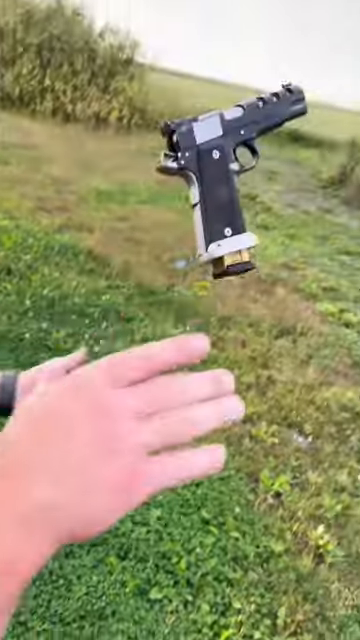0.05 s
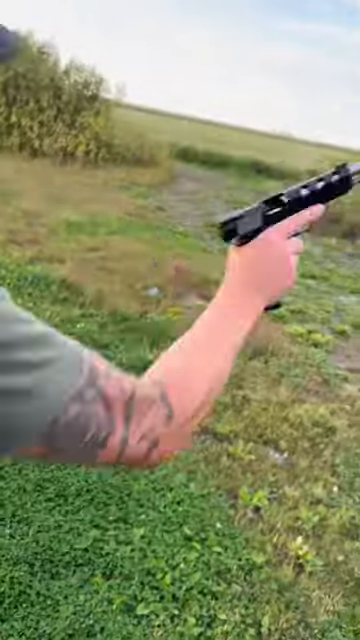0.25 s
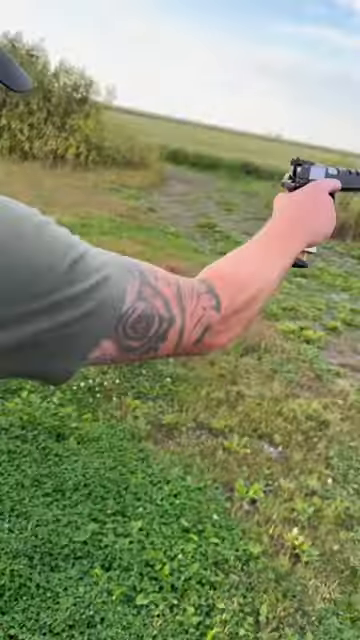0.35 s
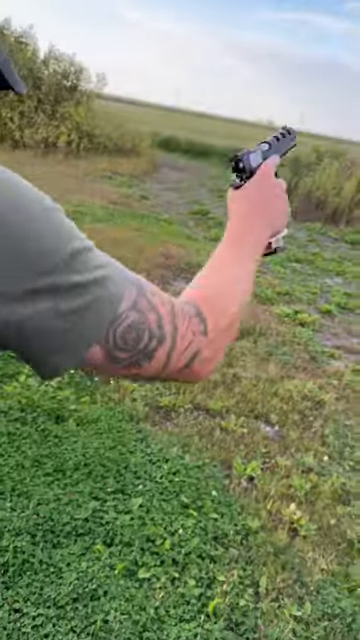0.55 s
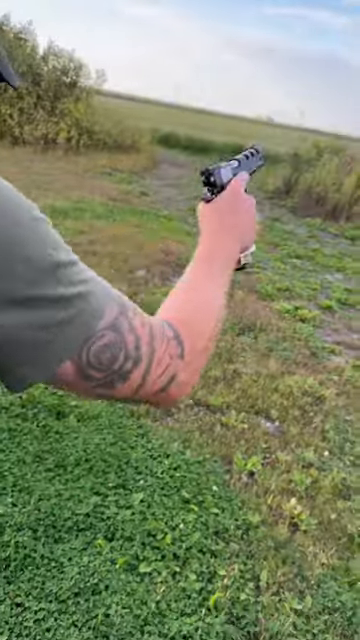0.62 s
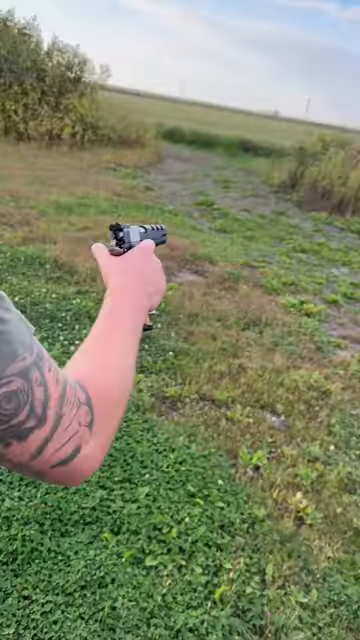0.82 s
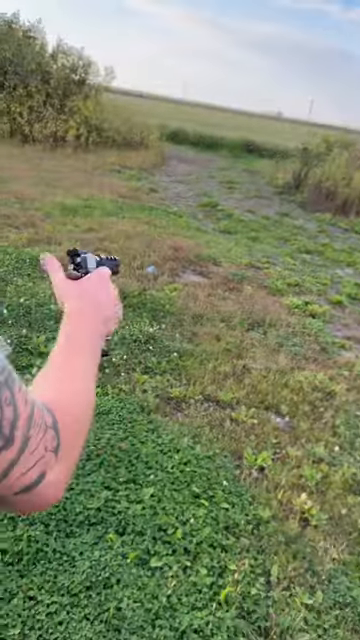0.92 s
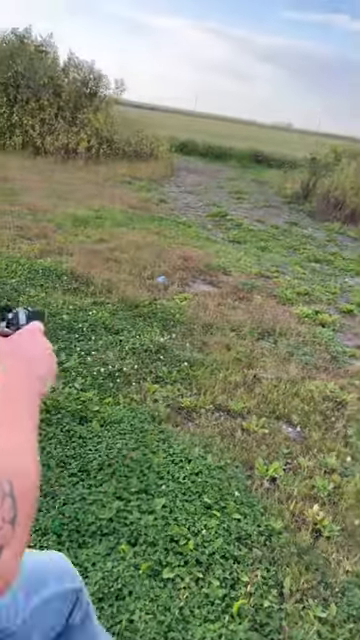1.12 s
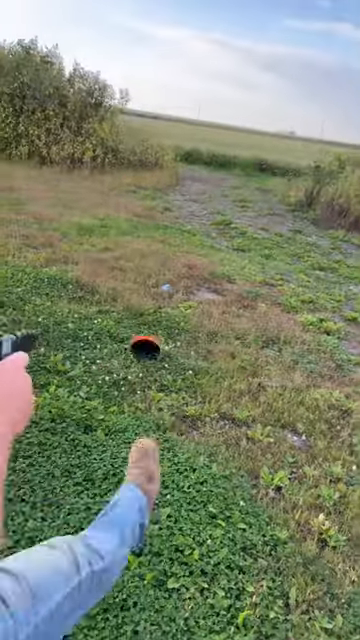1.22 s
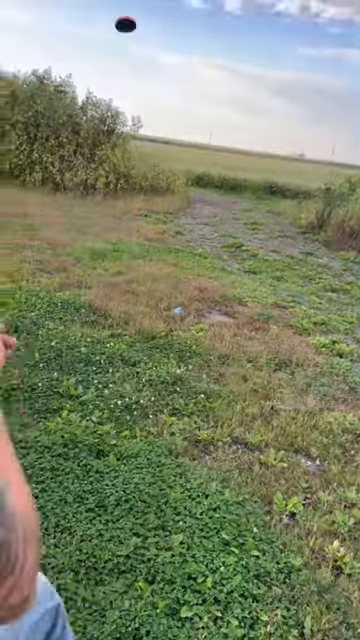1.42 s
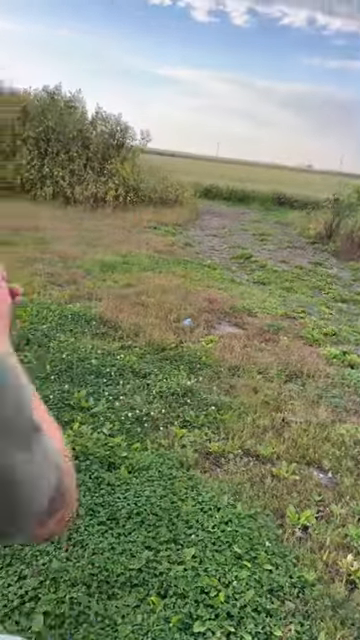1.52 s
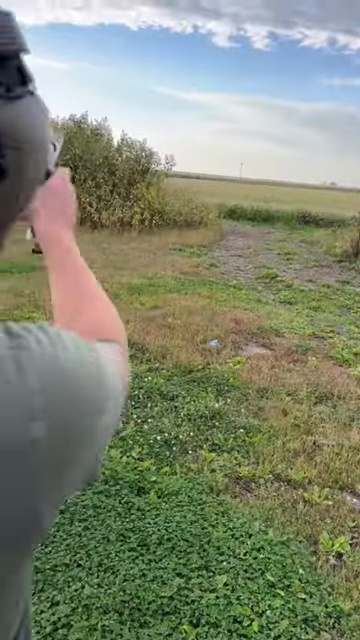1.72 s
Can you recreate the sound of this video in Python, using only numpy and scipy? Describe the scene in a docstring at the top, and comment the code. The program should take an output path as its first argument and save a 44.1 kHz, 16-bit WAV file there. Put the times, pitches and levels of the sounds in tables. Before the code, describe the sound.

A pistol's steel slide slams back at about 0.22 seconds and home at 0.28-0.30, two very loud, bright cracks with a short squeal, rail scrape, metallic ringing and a low thump. Small rattles and dull echoes from bushes fade by 0.5. High insects chirp throughout, dipping briefly after the blows. Soft grass steps come near 1.15 and 1.6, with rustling clothes and faint wind rumble.

```python
"""Insects chirp in an open field throughout, as near whistles, farther swarms and a blur of noise.
A pistol is caught in mid-air: its steel slide slams back and home in two loud, sharp reports, made of
noise bursts, pings and ringing modes, with a squeal and scrape of the rails. Low thumps, sines falling
quickly in pitch, go with the blows and the second step; bushes and far grass scatter noise back.
Small rattles, rustling clothes and two steps in the grass follow, over a light rumble of wind."""
import sys
import numpy as np
from scipy import signal
from scipy.fft import rfft, irfft
from scipy.io import wavfile

SR = 44100
rng = np.random.default_rng(int(sys.argv[2]) if len(sys.argv) > 2 else 0)


def master(y):
    """Save y as 16-bit WAV."""
    cut = np.clip(np.atleast_2d(y).T, -1, 1)
    pcm = np.round(cut * 32767)  # scale
    wavfile.write(sys.argv[1], SR, pcm.astype(np.int16))


N = 77175
T = np.arange(N) / SR  # time in seconds


def from_db(db):
    """Logarithmic level: decibels become an amplitude ratio."""
    return 10 ** (np.asarray(db) / 20)


def level(rows):
    """Amplitude modulation: a gain that follows a curve of seconds and dB."""
    return from_db(np.interp(T, *np.transpose(rows)))


def at_hz(points, hz):
    """Spectral envelope: dB interpolated along a logarithmic frequency axis."""
    point_hz, db = np.transpose(points)
    return np.interp(np.log(hz + 1), np.log(point_hz), db)


def envelope(start, rise, hold, t60):
    """Exponential decay: a straight rise and a hold, then 60 dB of fall in t60 seconds."""
    age = T - start
    release_age = np.maximum(age - rise - hold, 0)
    return np.clip(age / rise, 0, 1) * 1000. ** (-release_age / t60)


def lowpass(x, hz):
    """Zero-phase filtering: a gentle split of steady noise, in phase with its input."""
    return signal.sosfiltfilt(signal.butter(3, hz, fs=SR, output="sos"), x)


# Stereo width of noise. Each row: frequency in Hz, side relative to middle in dB before any added width.
WIDTH = [(60, -44), (250, -21), (650, -8), (1400, -22), (2600, -37.5), (3900, -23.5), (4900, -0.5),
         (5800, -20.5), (7200, -7.5), (9500, 1.5), (11000, 4), (12500, 21), (15000, 8.5)]
AMBIENT_WIDTH_DB = 2  # added width of the surroundings


def noise(spectrum, width_db=0, grains_per_s=0, grain_db=0):
    """Filtered random noise: coloured stereo, crackling grains if asked; the middle has rms 1."""
    hz = np.arange(N // 2 + 1) * SR / N
    white = rng.standard_normal((2, N))
    if grains_per_s:
        grain_times = rng.random(N) < grains_per_s / SR
        unit_power = np.sqrt(SR / grains_per_s)
        grains = rng.standard_normal((2, N)) * grain_times * unit_power
        white = white + from_db(grain_db) * grains  # grain level relative to the steady noise
    mid, side = irfft(rfft(white) * from_db(at_hz(spectrum, hz)), N)
    side = irfft(rfft(side) * from_db(at_hz(WIDTH, hz) + width_db), N)
    return np.array([mid + side, mid - side]) / mid.std()


# Steel hits steel. Each row: start in seconds, level in dB, bass and treble in dB relative to the
# middle band, t60 in seconds, ping pitch in Hz, ping level in dB over the blow's level.
BLOWS = [(0.2167, -13, -5, -3, 0.009, 6600, 1.5), (0.224, -16.5, -1, 2, 0.013, 5300, 1.5),
         (0.2289, -21, -15, -4, 0.01, 2300, -2.5), (0.2292, -14.5, 8, 6, 0.013, 6900, 2.5),
         (0.2438, -26, 1, -11, .05, 2600, 2), (0.2562, -24, -9, -20, 0.021, 1550, 1.5),
         (0.269, -25, 5.5, -16, .03, 1430, 3), (0.2749, -22, -1, -2.5, .02, 4100, 5),
         (0.2813, -14.5, -1, -4, 0.016, 4500, 3.5), (0.288, -27.5, -13, 5, 0.018, 3900, 7),
         (0.2979, -19, -3.5, 9, .012, 7900, 2.5), (0.3018, -16, -2.5, -2, 0.018, 5900, 2),
         (.3080, -27.5, 0.5, 0.5, 0.038, 6500, 0.5), (0.3735, -45.5, 8, -1.5, 0.032, 4400, 1),
         (0.388, -42, 2.5, -10, 0.029, 2150, 10.5), (0.8718, -54, -16.5, 0.5, 0.0098, 3300, -2),
         (1.2853, -59, -1.5, -28, .014, 2600, 2), (1.415, -73.5, 6.5, -11, 0.047, 1650, 4.5)]
# Colour of the blows. Each row: frequency in Hz, relative spectral level in dB.
STEEL_COLOUR = [(150, -39), (380, -23.5), (600, -4.5), (950, -16), (1400, -6.5), (2200, -1), (3200, 0.5),
                (4000, -2.5), (5000, 0), (6600, 0.5), (8500, -5.5), (10500, -8.5), (12200, -30),
                (15000, -14), (17000, -26.5)]
# Colour of their dying tail. Each row: frequency in Hz, relative spectral level in dB.
TAIL_COLOUR = [(200, -22), (700, -10.5), (1200, -17), (2150, 3.5), (2700, -8), (3400, -6.5), (5000, -3),
               (7000, -1.5), (10500, -6), (12000, -33), (16000, -26.5)]
BLOW_RISE_S, PING_T60_S = 0.00045, 0.0097
BASS_EDGE_HZ, TREBLE_EDGE_HZ = 1500, 5000
# tail levels are relative to each blow
NEAR_DB, NEAR_T60_S, FIELD_DB, FIELD_T60_S = -20.5, .1, -46.5, 0.29


def clacks():
    """Impact: each blow is a noise crack and brief ping, then a short scatter and faint field tail."""
    steel = noise(STEEL_COLOUR, grains_per_s=5000, grain_db=-3.5)
    bass = lowpass(steel, BASS_EDGE_HZ)
    treble = steel - lowpass(steel, TREBLE_EDGE_HZ)
    middle = steel - bass - treble
    blows, tail_power = 0, 0
    for s, db, bass_db, treble_db, t60, ping_hz, ping_db in BLOWS:
        colour = from_db(bass_db) * bass + middle + from_db(treble_db) * treble
        crack = envelope(s, BLOW_RISE_S, 0, t60) * colour
        ping_envelope = from_db(ping_db) * envelope(s, BLOW_RISE_S, 0, PING_T60_S)
        ping = ping_envelope * np.sin(2 * np.pi * ping_hz * (T - s))
        blows = blows + from_db(db) * (crack + ping)
        near = from_db(NEAR_DB) * envelope(s, 0.0004, 0, NEAR_T60_S)
        field = from_db(FIELD_DB) * envelope(s, 0.025, 0, FIELD_T60_S)
        tail_power = tail_power + (from_db(db) * (near + field)) ** 2
    return blows + np.sqrt(tail_power) * noise(TAIL_COLOUR)


# Ringing modes of slide and frame. Each row: frequency in Hz, mean level in dB relative to the blow,
# t60 in seconds.
GUN_MODES = [(1936, -29, .1), (2115, -24.5, .11), (2270, -23.5, .1), (2474, -26, .09), (2700, -26, 0.071),
             (3155, -22, .085), (3090, -21, 0.075), (3294, -22.5, .08), (4040, -27, .06), (4224, -25, .06),
             (4490, -25, .06), (4750, -27, 0.089), (4690, -27, .08), (5560, -25, .06), (5800, -23.5, .06),
             (6150, -24, .06), (6630, -21, .06), (7240, -24, 0.049), (8450, -29.5, 0.068),
             (10300, -31.5, 0.049)]


def gun_ring():
    """Modal resonance: every blow excites each damped mode with a random strength and sign."""
    s, db = np.transpose(BLOWS)[:2]
    strength_db = rng.normal(0, 2.5, (len(s), len(GUN_MODES)))
    ring = 0
    for k, (hz, mode_db, t60) in enumerate(GUN_MODES):
        clicks = np.zeros(N)
        signs = rng.choice([-1, 1], len(s))
        clicks[(s * SR).astype(int)] = from_db(db + mode_db + strength_db[:, k]) * signs
        r = np.exp(-np.log(1000) / (t60 * SR))  # decay per sample
        w = 2 * np.pi * hz / SR  # radians per sample
        # two-pole resonator; the tiny offset keeps its state from vanishing
        ring = ring + signal.lfilter([0, np.sin(w)], [1, -2 * r * np.cos(w), r * r], clicks + 1e-18)
    return ring


# Scrape of the slide. Each row: time in seconds, level in dB.
SCRAPE_LEVEL = [(.19, -120), (.215, -46.5), (.222, -33.5), (.248, -32), (.263, -33.5), (.278, -34.5),
                (.295, -45), (.315, -42), (.335, -67), (.38, -120)]
# Colour of the scrape on the rails. Each row: frequency in Hz, relative spectral level in dB.
RAIL_COLOUR = [(300, -28), (700, -10), (1100, -15.5), (2000, -5.5), (2700, -4.5), (3200, 5.5), (3800, -1),
               (5000, -7.5), (7000, -5.5), (10500, -16.5), (12000, -29), (16000, -27.5)]
SQUEAL_S, SQUEAL_HOLD_S, SQUEAL_T60_S = .217, 0.0049, 0.004
SQUEAL_HZ, SQUEAL_DB = 5776, -16.5


def slide():
    """Friction: the slide squeals as a tone as it starts back, and scrapes its rails as grainy noise."""
    squeal_envelope = envelope(SQUEAL_S, BLOW_RISE_S, SQUEAL_HOLD_S, SQUEAL_T60_S)
    squeal = from_db(SQUEAL_DB) * squeal_envelope * np.sin(2 * np.pi * SQUEAL_HZ * T)
    return squeal + level(SCRAPE_LEVEL) * noise(RAIL_COLOUR, grains_per_s=600, grain_db=3)


# Low falling thumps. Each row: start in seconds, level in dB, rise in seconds, t60 in seconds.
THUMPS = [(0.2289, -17.5, 0.018, 0.09), (0.3395, -47, 0.0034, 0.11), (1.604, -50, 0.016, 0.095)]
THUMP_START_HZ, THUMP_END_HZ, THUMP_FALL_S = 664, 47, .0054  # the fall is a time constant
BOOM_S, BOOM_HZ, BOOM_DB, BOOM_T60_S = .315, 46.8, -45.5, 0.58


def low_thumps():
    """Frequency glide: low thumps fall quickly in pitch; a low ring starts separately and lingers."""
    boom_envelope = envelope(BOOM_S, 0.0067, 0, BOOM_T60_S)
    out = from_db(BOOM_DB) * boom_envelope * np.sin(2 * np.pi * BOOM_HZ * (T - BOOM_S))
    for s, db, rise, t60 in THUMPS:
        fall = np.exp(-np.maximum(T - s, 0) / THUMP_FALL_S)
        hz = (THUMP_END_HZ + (THUMP_START_HZ - THUMP_END_HZ) * fall) * (T > s)
        phase = 2 * np.pi * np.cumsum(hz) / SR
        out = out + from_db(db) * envelope(s, rise, 0, t60) * np.sin(phase)
    return out


# Dull echoes from the bushes. Each row: start in seconds, level in dB, rise in seconds, t60 in seconds.
BUSH_ECHOES = [(.31, -36, 0.003, 0.069), (.337, -47, .003, .05), (.42, -67, 0.029, 0.33),
               (0.4207, -56, 0.0014, 0.048), (0.489, -59, 0.0033, 0.051)]
# Colour of the bushes' scatter. Each row: frequency in Hz, relative spectral level in dB.
BUSH_COLOUR = [(500, -33), (1100, -20.5), (1600, -8.5), (2200, 3.5), (2900, -6.5), (3800, -18), (8000, -21),
               (12000, -38)]
# Colour of the far grass's scatter. Each row: frequency in Hz, relative spectral level in dB.
FAR_GRASS_COLOUR = [(1000, -14.5), (3000, -12), (3900, -6), (5000, 1.5), (7000, 0.5), (9500, 1),
                    (10500, -8), (11500, -28)]
HUSH_S, HUSH_DB, HUSH_RISE_S, HUSH_T60_S = 0.365, -61, 0.053, 0.56


def echoes():
    """Diffuse reflection: bushes return dull bursts of noise, the far grass one bright hush."""
    bush_gain = sum(from_db(db) * envelope(s, rise, 0, t60) for s, db, rise, t60 in BUSH_ECHOES)
    dull = bush_gain * noise(BUSH_COLOUR)
    hush_gain = from_db(HUSH_DB) * envelope(HUSH_S, HUSH_RISE_S, 0, HUSH_T60_S)
    return dull + hush_gain * noise(FAR_GRASS_COLOUR)


# Parts of the two steps in the grass. Each row: start in seconds, level in dB, rise in seconds,
# hold in seconds, t60 in seconds.
STEPS = [(1.149, -64.5, 0.0078, 0.043, 0.38), (1.163, -55, .001, 0.0052, 0.051),
         (1.175, -54.5, 0.0038, 0.0062, 0.093), (1.612, -66.5, 0.03, 0.053, 0.87)]
# Colour of crushed turf. Each row: frequency in Hz, relative spectral level in dB.
TURF_COLOUR = [(35, -27), (80, 5), (240, -4), (450, -4.5), (1200, -6.5), (2200, -17), (4000, -23),
               (8500, -15.5), (11000, -21), (12500, -42.5), (16000, -23.5)]
# Colour of the soil's thud. Each row: frequency in Hz, relative spectral level in dB.
SOIL_COLOUR = [(60, -10), (140, -3), (240, 1), (400, -6), (700, -15), (2000, -36)]
THUD_S, THUD_DB, THUD_T60_S = 1.197, -56.5, 0.15  # the sole comes down


def footsteps():
    """Granular crushing: boots press grass into crackling noise, and a sole thuds on the soil."""
    weight = sum(from_db(db) * envelope(s, rise, hold, t60) for s, db, rise, hold, t60 in STEPS)
    crush = weight * noise(TURF_COLOUR, AMBIENT_WIDTH_DB, grains_per_s=900, grain_db=-4)
    thud = from_db(THUD_DB) * envelope(THUD_S, 0.0038, 0, THUD_T60_S) * noise(SOIL_COLOUR)
    return crush + thud


# Rustle of clothes. Each row: time in seconds, level in dB.
RUSTLE_LEVEL = [(0, -89), (.55, -82.5), (.85, -83), (1, -70), (1.12, -69.5), (1.25, -77), (1.36, -80.5),
                (1.57, -76.5), (1.66, -62), (1.75, -72)]
# Colour of the cloth. Each row: frequency in Hz, relative spectral level in dB.
CLOTH_COLOUR = [(100, 7), (400, 0.5), (900, -2), (1700, -2), (3500, -2), (6000, 0), (8000, 4),
                (10500, -2.5), (12000, -24.5), (15500, -12.5)]


def clothes():
    """Friction of fibres: grainy noise that swells and fades."""
    return level(RUSTLE_LEVEL) * noise(CLOTH_COLOUR, AMBIENT_WIDTH_DB, grains_per_s=1200, grain_db=-5.5)


CHIRP_WIDTH_S, CHIRP_SAG_HZ_PER_S = 0.0087, 19000  # width: from the peak to 1/e of it


def chirp(s, hz, db, pan_db):
    """Linear chirp: a falling whistle under a Gaussian swell, panned by level difference."""
    out = np.zeros((2, N))
    near = slice(*np.searchsorted(T, [s - 4 * CHIRP_WIDTH_S, s + 4 * CHIRP_WIDTH_S]))
    age = T[near] - s
    phase = 2 * np.pi * (hz - CHIRP_SAG_HZ_PER_S * age / 2) * age
    tone = np.exp(-(age / CHIRP_WIDTH_S) ** 2) * np.sin(phase)
    out[:, near] = from_db([[db + pan_db], [db - pan_db]]) * tone
    return out


# Near chirps. Each row: time of the peak in seconds, middle pitch in Hz, level in dB before panning.
NEAR_CHIRPS = [(.002, 6750, -56), (0.02, 4480, -54.5), (0.071, 6800, -58.5), (0.142, 6640, -58),
               (0.16, 4560, -69), (.18, 4380, -58), (0.613, 4500, -67), (.768, 6740, -68.5),
               (0.782, 4433, -59), (0.827, 4350, -57.5), (.9, 4430, -62), (.938, 4450, -51.5),
               (.982, 4460, -52), (1.126, 4724, -58.5), (1.176, 4680, -56.5), (1.228, 4650, -58),
               (1.324, 4650, -61), (1.385, 4390, -67), (1.435, 4240, -62), (1.483, 4230, -65),
               (1.557, 4270, -62.5), (1.597, 4400, -54), (1.639, 4420, -51.5), (1.722, 4680, -61.5)]


def near_insects():
    """Discrete sources: each near chirp stands at its own time, with a small random pan."""
    return sum(chirp(s, hz, db, rng.normal(0, 1)) for s, hz, db in NEAR_CHIRPS)


# Shift of the farther insects' pitch. Each row: time in seconds, shift in Hz.
SWARM_SHIFT = [(0, 0.5), (.8, -60.5), (1.1, 120), (1.3, 99.5), (1.45, -160), (1.6, 36), (1.75, 61)]


def swarm(rate, hz, spread_hz, db):
    """Jittered pulse train: chirps up to an interval early or late, varying in pitch, level and side."""
    draws = rng.uniform(-1, 1, size=(200, 4))
    out = 0
    for k, (late, high, loud, side) in enumerate(draws):
        if k < rate * T[-1]:
            shift_hz = np.interp(k / rate, *np.transpose(SWARM_SHIFT))
            pitch_hz = hz + shift_hz + np.sqrt(3) * spread_hz * high  # sqrt(3): spread is the deviation
            out = out + chirp((k + late) / rate, pitch_hz, db + 4 * loud, 2 * side)
    return out


# Farther insects. Each row: chirps per second, pitch in Hz before the shift, standard deviation of
# pitch in Hz, mean level in dB before the common gain.
SWARMS = [(50.35, 4600, 220, -68), (37.3, 5200, 200, -70), (25, 6700, 89, -70), (39.5, 7500, 180, -77.5)]
# Blur of the whole field's insects. Each row: frequency in Hz, relative spectral level in dB.
CHORUS_COLOUR = [(200, -16), (1000, -25.5), (3600, -31), (4100, -10.5), (4550, 6), (5300, -1.5),
                 (5900, -15), (6700, -5), (7700, -11), (9000, -20), (10800, -28.5), (12000, -41.5),
                 (15500, -26)]
# Common gain of the farther insects, briefly fainter after the blows. Each row: time in seconds, gain in dB.
FARTHER_GAIN = [(.2, 5), (.3, -10.5), (.52, -5.5), (.62, 1.5), (.85, 0.5), (1.1, -1.5), (1.6, 0.5)]


def farther_insects():
    """Superposition: random swarms and a blur of noise share one slowly changing gain."""
    chorus = from_db(-72) * noise(CHORUS_COLOUR, AMBIENT_WIDTH_DB)  # dB before the common gain
    return level(FARTHER_GAIN) * (chorus + sum(swarm(*row) for row in SWARMS))


# The wind's rumble. Each row: time in seconds, level in dB.
WIND_LEVEL = [(0, -73.5), (.09, -72), (.2, -60), (.5, -73.5), (.65, -72), (.85, -77.5), (1, -83),
              (1.3, -76.5), (1.45, -84.5), (1.56, -64.5), (1.63, -63), (1.75, -75.5)]
# Colour of the rumble. Each row: frequency in Hz, relative spectral level in dB.
RUMBLE_COLOUR = [(20, -28), (32, -11), (47, -1), (75, -0.5), (130, -12.5), (300, -28.5), (1000, -45),
                 (4000, -72)]


def wind():
    """Turbulence: light wind is low noise whose level wanders."""
    return level(WIND_LEVEL) * noise(RUMBLE_COLOUR)


def scene():
    """Linear superposition: the pistol, the low thumps, the person and the field add up."""
    pistol = clacks() + gun_ring() + slide()
    person = footsteps() + clothes()
    field = echoes() + near_insects() + farther_insects() + wind()
    return pistol + low_thumps() + person + field


def record(dry):
    """Saturation and band limiting: the highest peaks are rounded, then the top is cut at 16.4 kHz."""
    rounded = np.tanh(dry)
    return signal.sosfilt(signal.ellip(10, .1, 80, 16400, fs=SR, output="sos"), rounded)


dry = scene()
out = record(dry)
master(out)
```